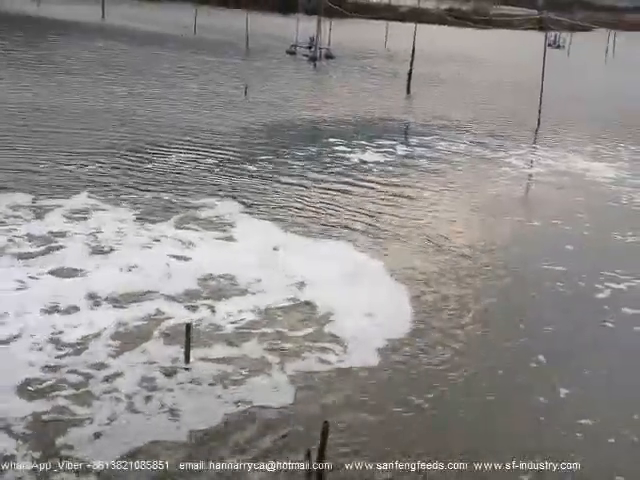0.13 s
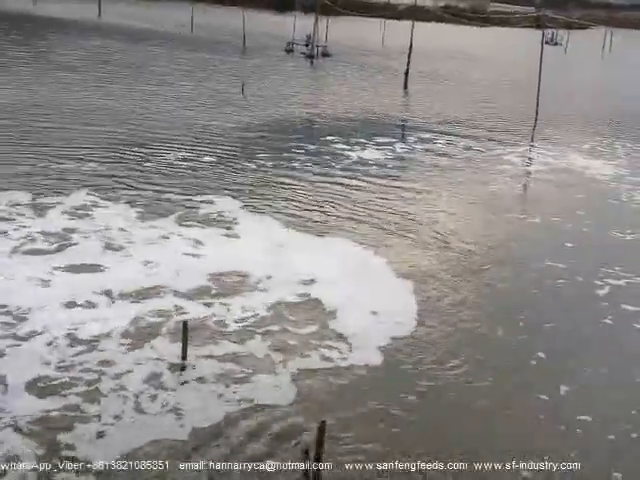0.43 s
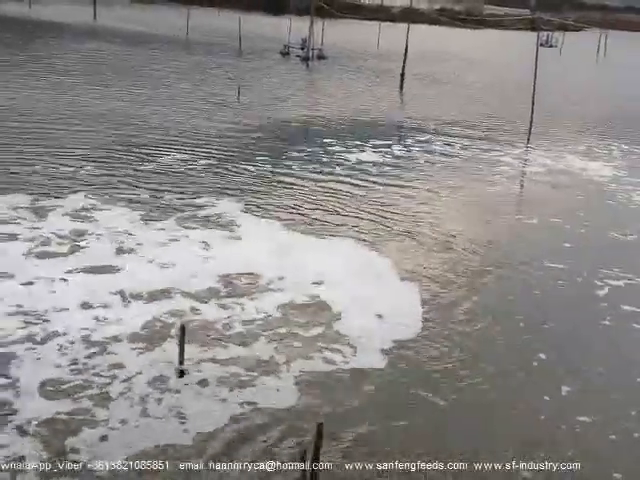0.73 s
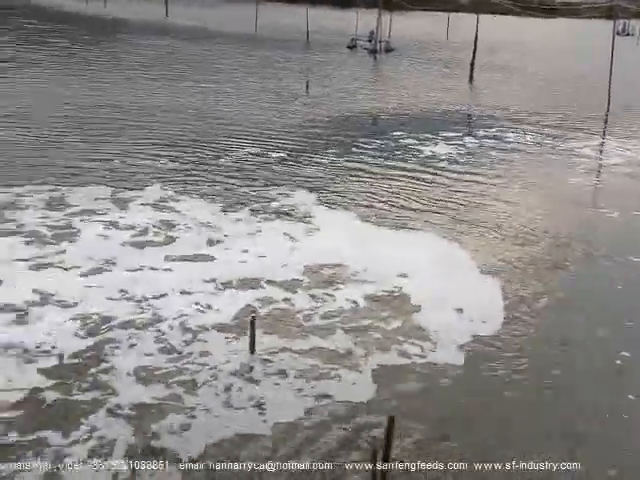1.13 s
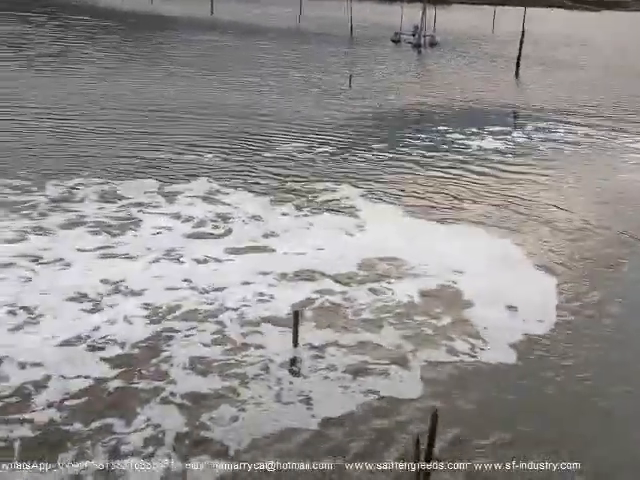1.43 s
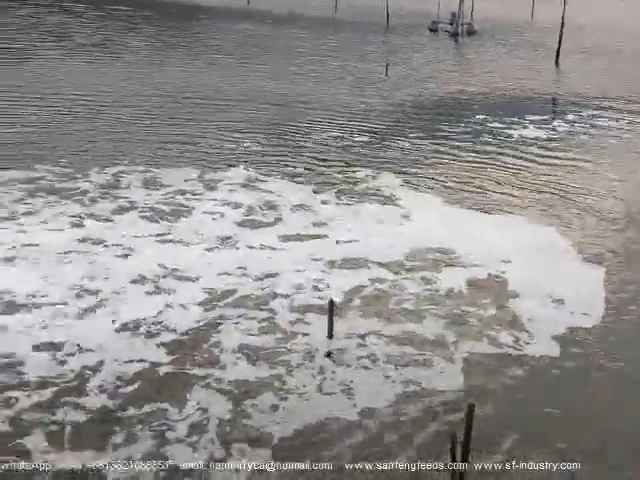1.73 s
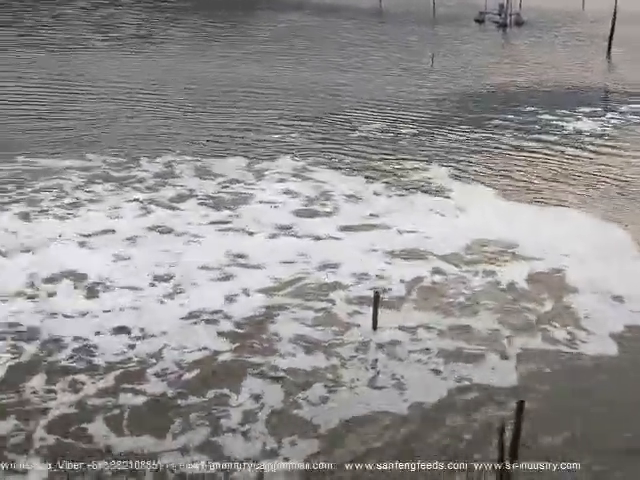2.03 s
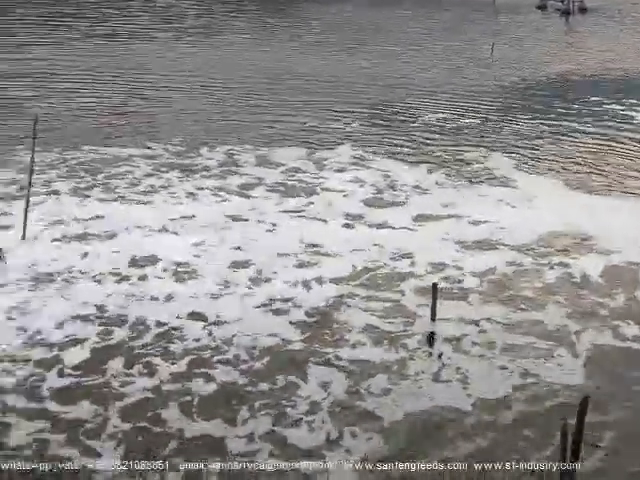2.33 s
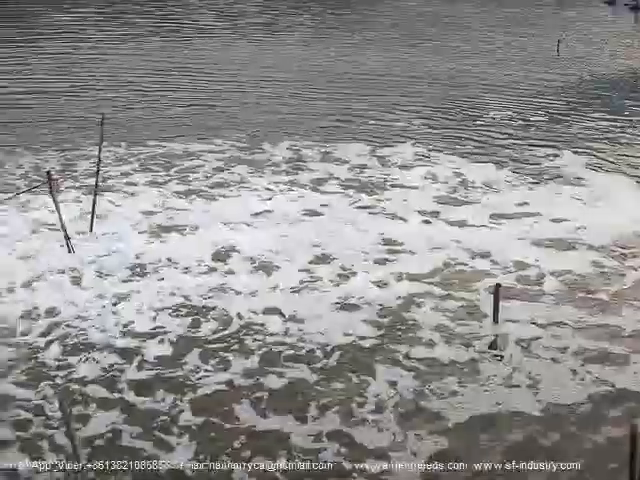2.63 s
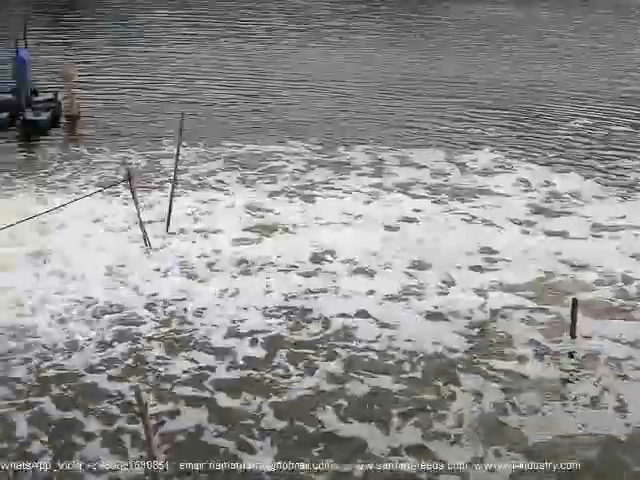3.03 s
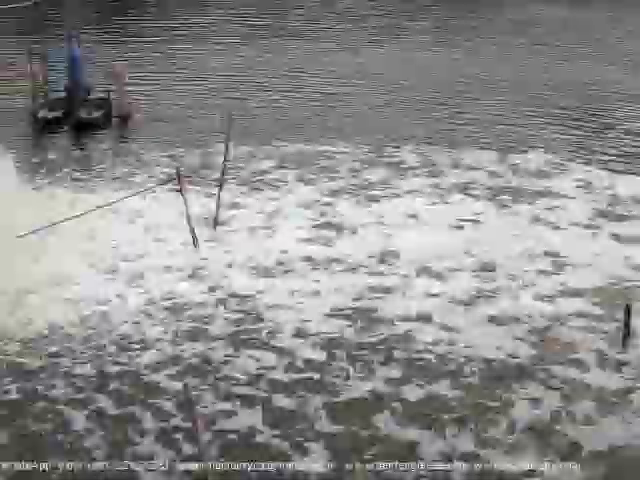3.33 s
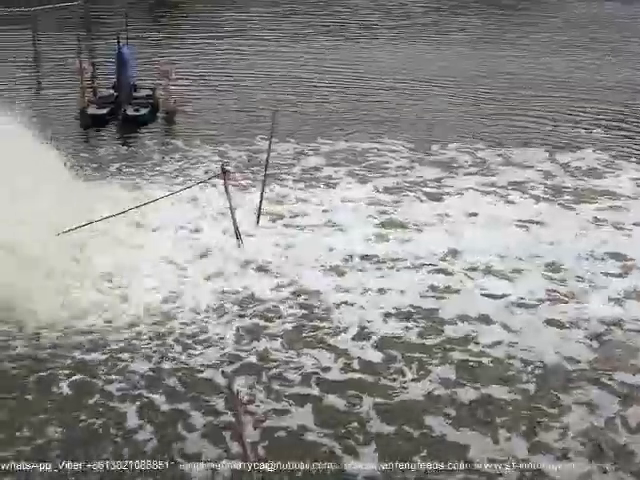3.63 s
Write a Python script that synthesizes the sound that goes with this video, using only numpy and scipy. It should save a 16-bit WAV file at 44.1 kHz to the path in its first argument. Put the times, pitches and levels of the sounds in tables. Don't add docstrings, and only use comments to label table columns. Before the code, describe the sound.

Paddle aerator churning pond water, constant hissing spray with a pulsing motor hum and soft thumps

```python
import sys
import numpy as np
from scipy import signal
from scipy.fft import rfft, irfft
from scipy.io import wavfile
from scipy.ndimage import uniform_filter1d

SR = 44100
rng = np.random.default_rng(int(sys.argv[2]) if len(sys.argv) > 2 else 0)


def voltage_ratio(level):
    return 10 ** (np.asarray(level, float) / 20)


def digitize_waveform(pressure):
    field = np.atleast_2d(pressure).T
    bounded = np.clip(field, -1, 1)
    quanta = np.round(bounded * 32767).astype(np.int16)
    wavfile.write(sys.argv[1], SR, quanta)


N = 167139
TURN_S = .6528
TOOTH_HZ = 80 / TURN_S


def evened(x):
    return x / np.sqrt(np.mean(x ** 2) + 1e-20)


def read(points, hz):
    f, value = np.transpose(points)
    return np.interp(np.log(hz + 1), np.log(f + 1), value)


def shaped(x, points):
    gain = voltage_ratio(read(points, np.fft.rfftfreq(x.shape[-1], 1 / SR)))
    return evened(irfft(rfft(x) * gain, x.shape[-1]))


def drift(t, top_hz):
    rates = top_hz * np.geomspace(.05, 1, num=20)
    return evened(sum(np.sin(2 * np.pi * (f * t + rng.random())) / np.sqrt(f) for f in rates))


def bell(t, centre, width):
    return np.exp(-((t - centre) / width) ** 2 / 2)


# centre_s, length_s, left_db, right_db
GUST_EVENTS = [(0.093, 0.085, -48, -64), (0.188, 0.018, -60, -53), (0.543, 0.16, -78, -59),
               (0.929, 0.093, -29, -63), (0.404, 0.089, -48, -44), (1.785, 0.24, -36, -54),
               (1.86, 0.077, -56, -60), (2.033, 0.22, -40, -39.5), (2.208, 0.3, -34, -50),
               (2.113, 0.029, -33, -57), (2.264, 0.052, -30.5, -50), (2.356, 0.17, -38.5, -50),
               (2.515, 0.22, -36, -69), (2.707, 0.023, -80.5, -35), (2.761, 0.12, -29.5, -53),
               (2.91, 0.14, -73, -57), (3.042, 0.34, -75, -43.5), (3.17, 0.29, -46.5, -42),
               (3.508, 0.04, -52, -42), (3.635, 0.15, -40.5, -39)]
# pitch_hz, level_db
WIND_COLOUR = [(20, -19), (40, -14), (90, 0), (130, -1), (200, -7.5), (300, -21), (600, -26.5),
               (5000, -110)]


def wind():
    t = np.arange(0, N, 64) / SR
    s, length, *port_dbs = np.transpose(GUST_EVENTS)
    shape = np.exp(-8 * ((t - s[:, None]) / length[:, None]) ** 2)
    ports = []
    for db in port_dbs:
        lumps = voltage_ratio(3.5 * drift(t, 30))
        level = (voltage_ratio(-61.5) + voltage_ratio(db) @ shape) * lumps
        ports.append(np.interp(np.arange(N) / SR, t, level) * shaped(rng.standard_normal(N), WIND_COLOUR))
    return np.array(ports)


def drops():
    drops_per_s, spread_db, drop_share = 4000, 1, .23
    size = voltage_ratio(spread_db * np.minimum(rng.exponential(1, N), 5)) * (rng.random(N) < drops_per_s / SR)
    kind, out = rng.integers(0, 24, N), np.zeros(N)
    for k, hz in enumerate(np.geomspace(400, 10000, num=24)):
        cycles = np.arange(int(12 * SR / hz)) * hz / SR
        grain = cycles * np.exp(-cycles / 1.7) * np.sin(2 * np.pi * cycles * (1 + .02 * cycles))
        grain = grain * np.sqrt(hz) / np.linalg.norm(grain)
        out += signal.oaconvolve(size * (kind == k), grain)[:N]
    return np.sqrt(drop_share) * evened(out) + np.sqrt(1 - drop_share) * rng.standard_normal(N)


# time_s, spray_db, lobe_scale (ratio), left_lead_ms, facing (0-1)
CAMERA_TURN = [
    (0, -44, 1, 0.57, 0.15),
    (.6, -44, 0.95, 0.59, 0.12),
    (1.299, -43, 0.99, 0.56, 0.37),
    (1.8, -43.5, 0.91, 0.56, 0.43),
    (2.3, -42, 0.87, 0.52, 0.79),
    (2.7, -42.5, 0.825, 0.525, 0.7),
    (3.2, -42, 0.73, 0.49, 0.95),
    (3.79, -42, 0.72, 0.45, 0.96),
]
# pitch_hz, level_db
LEFT_COLOUR = [(200, 3.5), (700, 3), (1300, -2.5), (6000, -1), (6900, -2.5), (8000, -14.5), (10500, -18),
               (12000, -26), (15000, -33.5)]
RIGHT_COLOUR = [(200, -19), (700, 3), (2200, -2), (5800, 4), (6900, -6.5), (8000, -21.5), (10300, -26),
                (15000, -32)]
# pitch_hz, width_hz, away_db, facing_db, slides (1 = moves with the turn)
LEFT_LOBES = [(750, 115, -5.5, 4.5, 0), (2100, 750, 3.5, 4, 0), (4500, 220, -7, 7, 0),
              (15100, 4200, 2.5, 12, 0)]
RIGHT_LOBES = [(1580, 790, 8, 0.32, 1), (3450, 256, 1, 8, 1), (5310, 330, -4, 9, 1),
               (4140, 1180, 3, 7.3, 1), (8000, 960, -1.5, 3.1, 1)]
# pitch_hz, likeness (0-1)
PORT_LIKENESS = [(300, 0.69), (900, 0.63), (2200, 0.32), (3300, 0.67), (5500, 0.2), (7000, 0.05),
                 (12000, .1)]
# pitch_hz, lead_rad
BODY_BEND = [(200, 3.5), (700, -1.09), (1100, -1.28), (1400, -1), (2600, -0.44), (3000, 0.59), (6000, 1.5)]


def spray():
    hz, t, z = signal.stft(np.array([drops(), drops()]), SR, nperseg=512, noverlap=384)
    f = hz[:, None]
    s, *columns = np.transpose(CAMERA_TURN)
    db, scale, lead_ms, facing = (np.interp(t, s, c) for c in columns)
    tremble = abs(z[1, 9]) - abs(z[1, 9]).mean()
    scale = scale * (1 + .018 * evened(uniform_filter1d(tremble, size=40)))
    patches = uniform_filter1d(rng.standard_normal(z[0].shape), size=4, axis=0)
    patches = evened(uniform_filter1d(patches, size=14, axis=1))
    flicker_db, swell_db = .5 * drift(t, 40), .35 * drift(t, 4.6)
    field_db = db + 1.3 * patches + flicker_db + swell_db
    same = np.clip(read(PORT_LIKENESS, f), 0, 1)
    left = z[0] * np.exp(2j * np.pi * f * lead_ms / 1000 + 1j * read(BODY_BEND, f))
    right = same * z[0] + np.sqrt(1 - same ** 2) * z[1]
    ports = [left, right]
    for k, (base, lobes) in enumerate([(LEFT_COLOUR, LEFT_LOBES), (RIGHT_COLOUR, RIGHT_LOBES)]):
        colour_db = read(base, f) + field_db
        for lobe_hz, width, away_db, facing_db, slides in lobes:
            at = lobe_hz * (scale if slides > .5 else 1)
            lobe_db = away_db + (facing_db - away_db) * facing
            colour_db = colour_db + lobe_db * np.exp(-2 * ((f - at) / width) ** 2)
        ports[k] = ports[k] * voltage_ratio(colour_db)
    return signal.istft(np.array(ports), SR, nperseg=512, noverlap=384)[1][:, :N] * voltage_ratio(4.5)


# start_s, pitch_hz, level_db
SLAP_EVENTS = [
    (.118, 520, -41),
    (.176, 650, -37.5),
    (.195, 750, -44),
    (2.093, 785, -44),
    (2.175, 675, -43),
    (2.385, 940, -45),
    (2.575, 654, -39),
    (2.69, 820, -39),
    (3.432, 710, -39),
]


def slaps():
    t, out = np.arange(SR // 25) / SR, np.zeros(N + SR)
    decay_s = .0014
    for s, hz, db in SLAP_EVENTS:
        at = round(s * SR)
        envelope = np.e * t / decay_s * np.exp(-t / decay_s)
        out[at:at + len(t)] += voltage_ratio(db) * envelope * np.sin(2 * np.pi * hz * t * (1 - 8 * t))
    return out[:N]


# start_s, bite (0-1), hull_db, float_db, frame_db
PADDLE_ENTRIES = [(.02, 0.84, -60, -77, -56.5), (.08, 0.9, -48, -51.5, -55), (.13, 0, -49, -53, -48.5),
                  (.18, 1, -80, -44.5, -48), (.23, 0, -50.5, -44.5, -59), (.28, 0.9, -50, -45.5, -60.5),
                  (.36, 1, -50.5, -57, -77), (.43, 1, -50.5, -52, -90), (.50, 0.4, -53, -53.5, -51.5),
                  (.55, 0.54, -50, -106, -71), (.61, 1, -53.5, -76, -61)]


def entries():
    turns = 6
    rows = np.tile(PADDLE_ENTRIES, (turns, 1))
    turn = np.repeat(np.arange(turns), len(PADDLE_ENTRIES))
    return rows[:, 0] + turn * TURN_S, rows, 2.5 * rng.standard_normal((len(rows), 4))


# pitch_hz, width_hz
BODY_MODES = [
    (112, 19.45),
    (173, 23.95),
    (420, 29.3),
]
# pitch_hz, level_db
RUMBLE_COLOUR = [(60, -3), (100, -0.5), (200, 8), (300, 10), (420, 6), (480, -18), (700, -41), (5000, -100)]


def thumps(when, rows, chance_db):
    t, out = np.arange(SR // 8) / SR, np.zeros(N + SR)
    early = SR // 4
    for k, (hz, width) in enumerate(BODY_MODES):
        damping = np.pi * width
        ring = np.e * damping * t * np.exp(-damping * t) * np.sin(2 * np.pi * hz * t)
        blows = np.zeros(N + SR)
        blows[(when * SR).astype(int) + early] = np.sqrt(2) * voltage_ratio(rows[:, 2 + k] + chance_db[:, 1 + k])
        out += np.roll(signal.oaconvolve(blows, ring)[:N + SR], -early - int(SR / damping))
    repeating = np.resize(rng.standard_normal(round(TURN_S * SR)), N)
    rumble = voltage_ratio(-48) * shaped(.73 * repeating + .65 * rng.standard_normal(N), RUMBLE_COLOUR)
    return (out[:N] + rumble) * voltage_ratio(np.array([[-1.2], [1.2]]))


# centre_s, width_s, level_db
WHINE_SWELLS = [
    (.85, 0.057, -55),
    (2.13, 0.017, -50),
    (2.25, 0.02, -50.5),
    (2.469, 0.011, -44),
    (2.86, 0.051, -49.5),
    (3.122, 0.026, -44.5),
    (3.251, 0.033, -52.5),
    (3.72, 0.017, -51),
]


def whine():
    t = np.arange(N) / SR
    level = sum(voltage_ratio(db) * bell(t, s, width) for s, width, db in WHINE_SWELLS)
    phase = 2 * np.pi * 5 * TOOTH_HZ * t
    phase = phase + 2.2 * np.interp(t, t[::64], drift(t[::64], 30))
    pan = voltage_ratio(np.array([[2.2], [-2.2]]))
    return np.sqrt(2) * level * pan * np.sin(phase - np.array([[0], [1.2]]))


# time_s, level_db
LOAD_CYCLE = [(0, -51.5), (.12, -26.5), (.19, -32.5), (.26, -59), (.5, -33), (.58, -34), (.66, -45.5),
              (.82, -40), (1.02, -49), (1.26, -35.5), (1.45, -41.5), (1.58, -62.5), (1.87, -37),
              (1.942, -63), (2.102, -35), (2.35, -58.5), (2.48, -50.5), (2.578, -46)]
# centre_s, width_s, change_db
TOOTH_SLACK = [
    (.19, .015, -4),
    (.30, .018, -9),
    (.42, .015, -7),
    (.635, .014, -9),
]
# centre_s, width_s, change_db
LOAD_SLIPS = [(.22, 0.0077, -8), (.42, .02, 10), (1.073, 0.023, -15), (1.28, 0.018, 6.5),
              (1.36, 0.025, -13), (1.46, .025, 3), (1.497, .008, -32), (1.745, 0.01, -21),
              (2.421, 0.022, 2), (3.05, .015, -14), (3.13, 0.021, -16), (3.33, 0.062, 5.5),
              (3.47, 0.02, -16), (3.73, 0.012, 5.5)]
# centre_s, width_s, level_db
PADDLE_GRIPS = [(0.032, 0.016, -41), (0.077, 0.017, -39), (0.169, 0.0085, -37), (0.215, 0.0052, -47),
                (0.292, 0.0098, -40), (0.374, 0.054, -40.5), (0.414, 0.015, -41), (0.474, 0.0074, -48),
                (0.499, 0.0039, -38), (0.544, 0.0033, -36), (0.606, 0.012, -40.5), (0.686, 0.02, -45),
                (0.771, 0.009, -46), (0.823, 0.018, -42), (0.928, 0.018, -39), (0.993, 0.012, -47),
                (1.033, 0.016, -39.5), (1.27, 0.022, -41), (1.332, 0.029, -41.5), (1.379, 0.008, -47),
                (1.489, 0.014, -49), (1.609, 0.012, -51), (1.696, 0.015, -44.5), (1.806, 0.01, -40),
                (1.853, 0.0099, -39.5), (1.923, 0.015, -39), (1.953, 0.0057, -50), (1.99, 0.025, -43.5),
                (2.028, 0.0091, -44), (2.068, 0.0076, -45), (2.13, 0.0056, -42), (2.24, 0.019, -38),
                (2.335, 0.018, -48), (2.395, 0.0092, -49), (2.464, 0.011, -38.5), (2.499, 0.011, -46),
                (2.556, 0.021, -40), (2.664, 0.023, -45.5), (2.779, 0.0092, -38), (2.891, 0.023, -42),
                (2.996, 0.031, -47), (3.12, 0.015, -40), (3.155, 0.057, -43.5), (3.203, 0.01, -36.5),
                (3.285, 0.02, -42), (3.34, 0.0063, -45), (3.377, 0.0041, -41), (3.442, 0.011, -36.5),
                (3.542, 0.02, -41.5), (3.587, 0.0037, -39.5), (3.647, 0.021, -42.5), (3.764, 0.0064, -46)]
# order, level_db, load_share (ratio), bite_share (ratio), facing_gain_db
MESH_ORDERS = [
    (1, -18.5, 0, 0.63, 8),
    (2, 4.5, 0.51, 0.053, 1.5),
    (3, -2, 0, 0, 0),
    (4, -27, 0.81, 0.075, 0),
    (5, -44.5, 0.24, 0.97, 21),
]
# pitch_hz, balance_db
GEAR_PAN = [(120, -1), (245, -2.5), (370, -7), (610, -3)]


def gearbox(when, rows, chance_db):
    t = np.arange(N) / SR
    coarse = t[::64]
    s, db = np.transpose(LOAD_CYCLE)
    load_db = uniform_filter1d(np.interp(t, s, db, period=4 * TURN_S), size=800)
    load_db = load_db + sum(db * bell(t % TURN_S, s, width) for s, width, db in TOOTH_SLACK)
    load_db = load_db + sum(db * bell(t, s, width) for s, width, db in LOAD_SLIPS)
    s, width, db = np.transpose(PADDLE_GRIPS)[:, :, None]
    grip = np.interp(t, coarse, voltage_ratio(-56) + (voltage_ratio(db) * bell(coarse, s, width)).max(0))
    bite_depth_db, bite_s = 19, .017
    strength = rows[:, 1] + chance_db[:, 0] / bite_depth_db
    bumps = strength[:, None] * bell(coarse, when[:, None], bite_s)
    bite_db = bite_depth_db * (np.interp(t, coarse, bumps.sum(0)) - .5)
    facing = np.interp(t, *np.transpose(CAMERA_TURN)[::4])
    out = np.zeros((2, N))
    for order, db, load, bite, facing_db in MESH_ORDERS:
        hz = order * TOOTH_HZ
        level = db + load_db.mean() + load * (load_db - load_db.mean()) + bite * bite_db + facing_db * facing
        level = level + 2.5 * bite * np.interp(t, coarse, drift(coarse, 4.6))
        if order == 3:
            level = db + 20 * np.log10(grip)
        wobble = .08 * order ** 2.1 * np.interp(t, coarse, drift(coarse, 26))
        pan = read(GEAR_PAN, hz) / 2
        tone = np.sin(2 * np.pi * (hz * t + rng.random()) + wobble)
        out += np.sqrt(2) * voltage_ratio(level + np.array([[pan], [-pan]])) * tone
    return out


def scene():
    paddles = entries()
    background = wind() + spray() + slaps()
    return background + thumps(*paddles) + whine() + gearbox(*paddles)


def top_cut(x):
    return signal.sosfilt(signal.butter(12, 15160, fs=SR, output="sos"), x)


# pitch_hz, threshold_db
LEFT_GATE = [(6000, -25), (8000, 0), (10500, 1), (11500, 5), (15000, 6)]
RIGHT_GATE = [(6000, -25), (7300, 3), (8200, 10), (9500, 4), (11700, 7), (15000, 5.5)]


def record(dry):
    hop, lead = 1024, 1224
    n, k = np.arange(2 * hop)[:, None] + .5, np.arange(hop) + .5
    window = np.sin(np.pi * n / (2 * hop))
    basis = np.sqrt(2 / hop) * window * np.cos(np.pi / hop * (n + hop / 2) * k)
    tail = 2 * hop - (N + lead) % hop
    blocks = np.pad(dry, ((0, 0), (lead, tail)), mode="reflect").reshape(2, -1, hop)
    lines = np.concatenate([blocks[:, :-1], blocks[:, 1:]], axis=2) @ basis
    waver_db = np.repeat(2.5 * rng.standard_normal((2, lines.shape[1], 32)), 32, axis=2)
    mean = uniform_filter1d(uniform_filter1d(abs(lines), size=24, axis=2), size=40, axis=1)
    hz = k * SR / (2 * hop)
    gate_db = np.array([read(LEFT_GATE, hz), read(RIGHT_GATE, hz)])[:, None] + waver_db
    kept = (lines * (abs(lines) > mean * voltage_ratio(gate_db))) @ basis.T
    gated = (kept[:, 1:, :hop] + kept[:, :-1, hop:]).reshape(2, -1)[:, lead - hop:lead - hop + N]
    fade_out = np.minimum(np.arange(N)[::-1] / 150, 1)
    return top_cut(gated * fade_out)


dry = scene()
out = record(dry)
digitize_waveform(out)
```